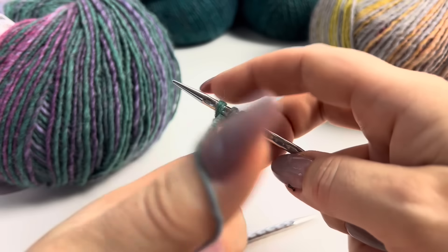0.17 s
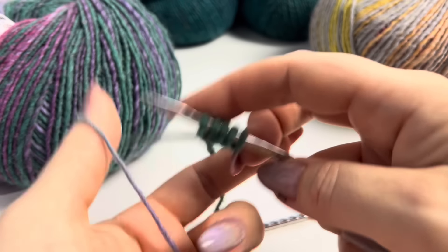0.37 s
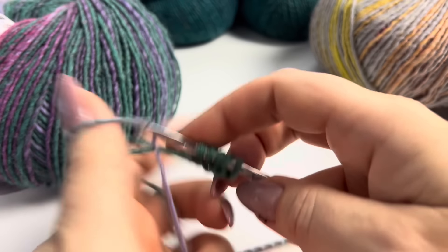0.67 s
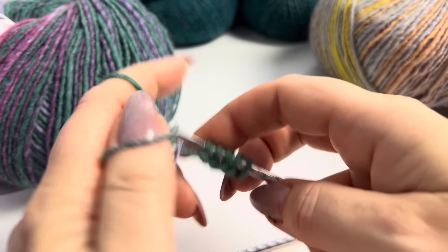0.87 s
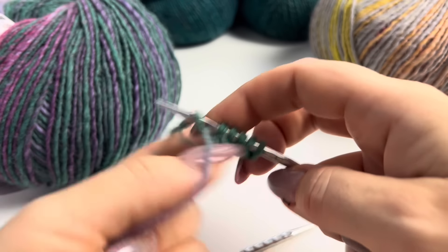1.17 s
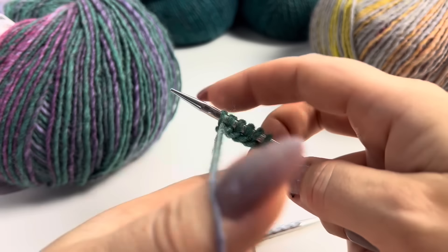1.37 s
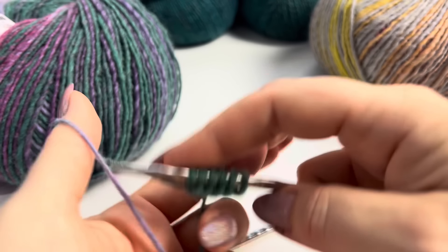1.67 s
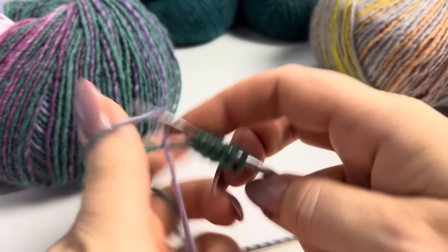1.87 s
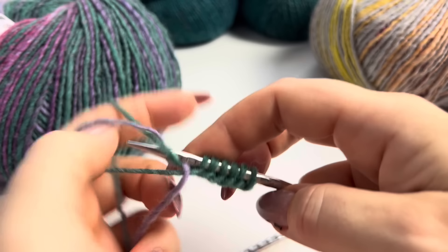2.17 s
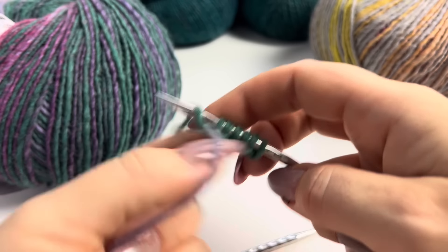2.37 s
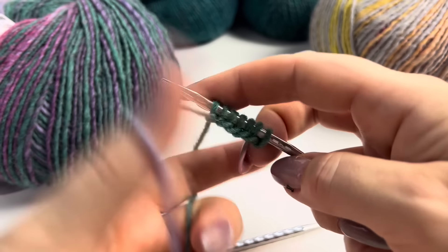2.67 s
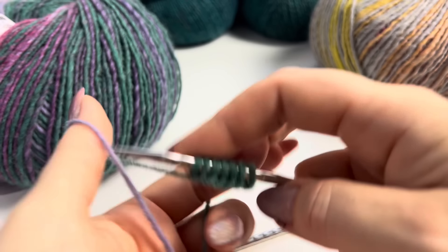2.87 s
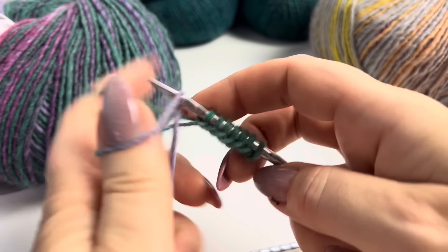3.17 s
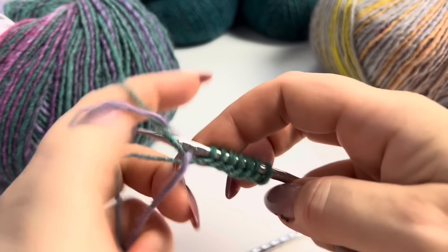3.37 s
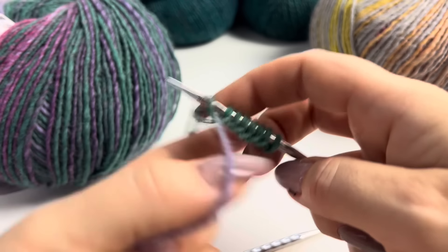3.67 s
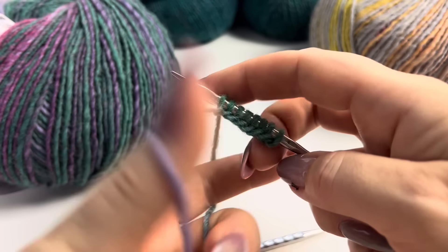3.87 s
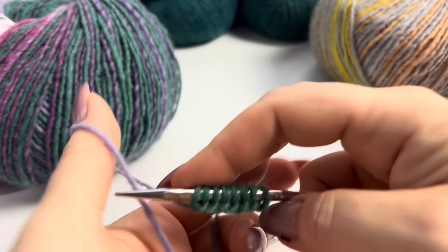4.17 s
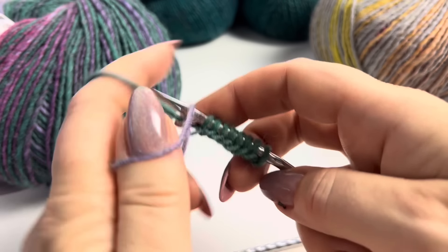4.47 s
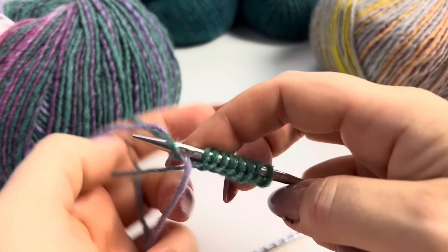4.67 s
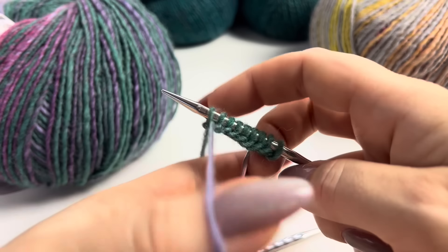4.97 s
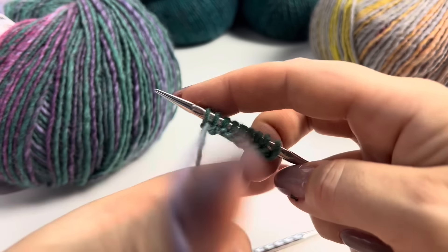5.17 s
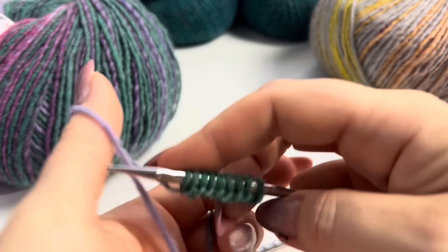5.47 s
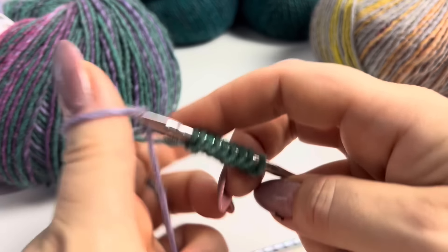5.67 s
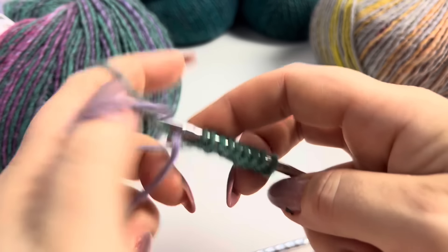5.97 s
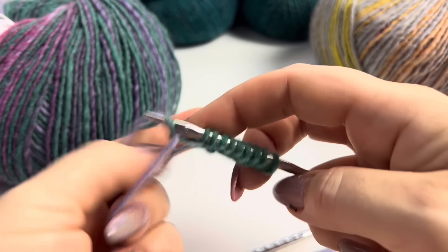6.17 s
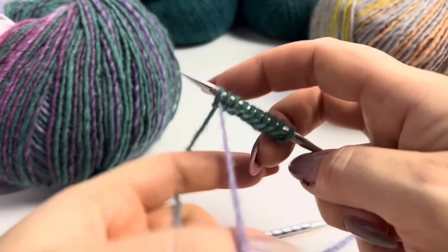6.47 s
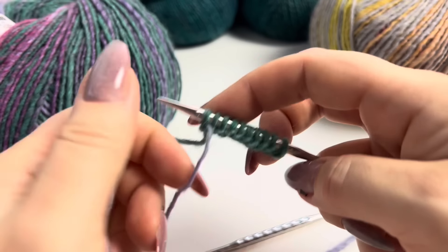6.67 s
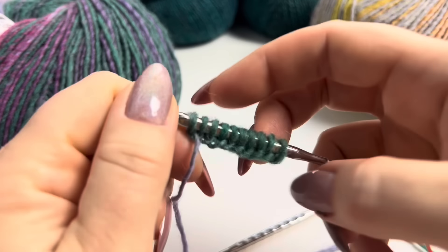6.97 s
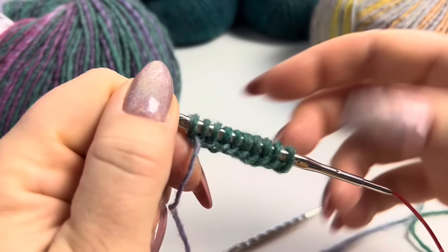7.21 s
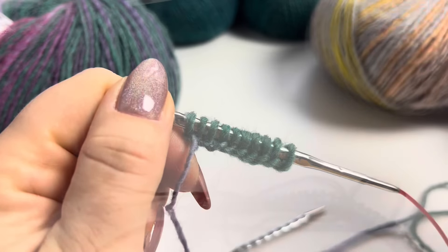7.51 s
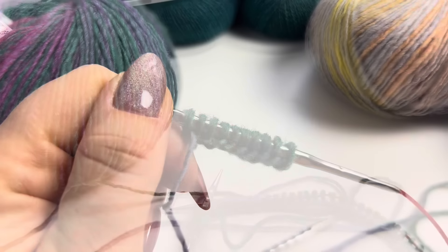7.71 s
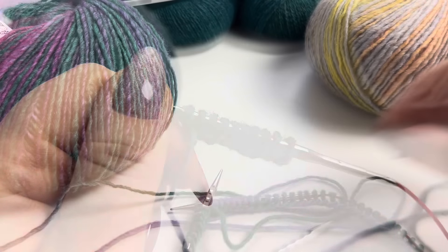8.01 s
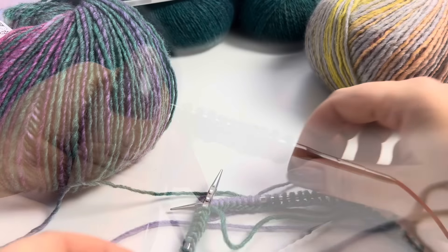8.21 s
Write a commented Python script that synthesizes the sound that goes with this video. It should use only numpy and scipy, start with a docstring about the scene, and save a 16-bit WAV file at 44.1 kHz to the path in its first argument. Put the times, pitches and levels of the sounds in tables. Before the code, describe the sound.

Close, faint clicks of steel needles with short dull table knocks and scratchy dragging, clustering around three and seven seconds over soft room hiss.

```python
"""Metal knitting needles tick together and sing briefly, at a table in a quiet room, close to a phone.
The loose needle and its cable knock, drag and chatter over the table top; yarn once hisses along a needle.
Contacts are noise bursts and short tones through resonances; dragging is random slips and scrape through
the table's modes. The walls answer the needles and knocks. Behind lie slow pushes of air on the microphone
and room tone: faint hum, far murmur and hiss, all made of shaped noise."""
import sys
import numpy as np
from scipy import signal
from scipy.fft import rfft, irfft, next_fast_len
from scipy.io import wavfile
from scipy.ndimage import uniform_filter1d, map_coordinates

SR = 44100
rng = np.random.default_rng(int(sys.argv[2]) if len(sys.argv) > 2 else 0)


def wav_record(signal):
    """Record a signal, one row per channel, as 16-bit PCM in the file named by sys.argv[1]."""
    frames = np.transpose(np.atleast_2d(signal))
    bounded = np.clip(frames, -1, 1)
    # unit amplitude maps onto the largest positive 16-bit level
    quanta = np.round(bounded * 32767).astype(np.int16)
    wavfile.write(sys.argv[1], SR, quanta)


N = 368058  # length in samples
CONTACT_LAG = .001  # from the listed time of a tick or knock to its burst (s)

# Resonances of the table top, in families from low to high.
# Each row: centre in Hz, width in Hz, level in dB against its family.
TABLE_LOW = [(352, 78, -7), (509, 28, -0.5)]
TABLE_DEEP = [(642.5, 55, -2), (725, 20.3, 2.5), (779, 17, -6.5)]
TABLE_BODY = [(807, 21, 1.5), (912, 27, 1.5), (1067.4, 14, -3.5)]
TABLE_MIDDLE = [(1168, 62, -0.5), (1296, 55, -0.5), (1383, 56, -1.5), (1489, 31, 1.5)]
TABLE_HARD = [(1630, 35, 5.5), (1760, 120, 2.5), (1955, 99, 1)]
TABLE_SINGING = [(2061, 34, 4), (2181, 41, 1)]
TABLE_UPPER = [(2304, 77, -2), (2448, 62, 2), (2650, 99, -3), (2825, 40, 0), (2990, 79, -7),
               (3150, 40, -2.5)]
TABLE_FIZZ = [(3385, 120, 0.5), (3870, 220, -3.5), (4190, 320, -6), (4970, 1240, -12), (5600, 310, -11.5),
              (7200, 800, -16)]
FAMILIES = (TABLE_LOW, TABLE_DEEP, TABLE_BODY, TABLE_MIDDLE,
            TABLE_HARD, TABLE_SINGING, TABLE_UPPER, TABLE_FIZZ)


def amp(db):
    """dB to gain."""
    return 10 ** (np.asarray(db) / 20)


def unit(x):
    """Scaled to rms 1."""
    return x / np.sqrt(np.mean(x ** 2) + 1e-20)


def along(points, hz):
    """Values at hz from (Hz, value) points, straight lines on a log frequency axis."""
    f, v = np.transpose(points)
    return np.interp(np.log(hz + 1), np.log(f + 1), v)


def curves(rows):
    """One value per sample for each column after the time."""
    s, *cols = np.transpose(rows)
    return np.array([np.interp(np.arange(N) / SR, s, c) for c in cols])


def wobble(rate):
    """A smooth random curve, rate knots a second."""
    knots = rng.standard_normal(int(N * rate / SR) + 4)
    return map_coordinates(knots, [np.arange(N) * rate / SR])


def filtered(x, response):
    """x times a complex response of frequency."""
    m = next_fast_len(x.shape[-1] + SR)  # spare room for the tail
    return irfft(rfft(x, m) * response(np.fft.rfftfreq(m, 1 / SR)), m)[..., :x.shape[-1]]


def modes(table):
    """Causal response of (Hz, width Hz, dB) resonances, added with alternating sign."""
    def response(f):
        total = 0
        for k, (centre, width, db) in enumerate(table):
            damping = 1j * f * width
            total = total + (-1) ** k * amp(db) * damping / (centre * centre - f * f + damping)
        return total
    return response


def burst(table, t60, rattle, size=4096):
    """One sharp contact with a short rattle behind it wakes resonances unevenly; peak 1."""
    force = rattle * rng.standard_normal(size) * amp(-60 * np.arange(size) / SR / t60)
    force[0] = -1  # the blow itself
    uneven = [(hz, width, db + rng.normal(0, 1.8)) for hz, width, db in table]
    puff = filtered(force, modes(uneven))
    return puff / np.abs(puff).max()


def ticks():
    """Steel meets steel: a bright burst of the tips, a dull one of the shafts, and a brief ring."""
    # Ticks. Each row: time in seconds, level in dB before a common lift,
    # then against the tip burst: shaft burst in dB, ring in dB.
    tick_rows = [(0.0826, -52, 1, -23), (0.133, -57, -1, -25), (0.1609, -59, 2, -25),
                 (0.2607, -58, -6, -30), (0.616, -45, -8, -45), (0.6345, -52, 6, -25),
                 (0.9816, -41, -9, -53), (0.9994, -49, -10, -33), (1.0182, -47, -14, -38),
                 (1.451, -49, -5, -35), (1.6158, -42.5, -15, -40), (1.7272, -48, 8.5, -30),
                 (2.9768, -64, 2, -9), (2.999, -60, 7, -10), (3.026, -33, -4, -38), (3.0705, -52, 0, -7),
                 (3.095, -54, 10, -8), (3.121, -60, 1, -8), (4.2377, -59, 8, -11), (6.8122, -36, -16, -36),
                 (6.818, -45, -11, -28)]
    # Resonances of the tips, then of the shafts. Each row: centre in Hz, width in Hz, level in dB.
    tip_modes = [(14450, 2300, 20), (15200, 1600, 20), (10500, 9900, 3)]
    shaft_modes = [(2500, 900, -40), (4250, 1100, -4), (5740, 3600, 16), (9600, 5600, 5)]
    # Ring where the needle hangs free. Each row: mean pitch in Hz, mean level in dB, t60 in seconds.
    ring_modes = [(12400, 2, 0.099), (12420, -22, 0.06), (13000, -8, 0.03)]
    out, t = np.zeros(N + SR), np.arange(4096) / SR
    for s, db, shaft_db, ring_db in tick_rows:
        ring = 0
        for hz, level, t60 in ring_modes:
            decay = amp(level + rng.normal(0, 4.1) - 60 * t / t60)
            ring = ring + decay * np.sin(2 * np.pi * hz * rng.normal(1, 0.0057) * t)
        tick = burst(tip_modes, 0.011, 0.5)
        tick = tick + amp(shaft_db) * burst(shaft_modes, .003, .15) + amp(ring_db) * ring
        out[round((s + CONTACT_LAG) * SR):][:len(t)] += amp(db + 3.0) * tick
    return out[:N]


def pings():
    """A needle sings briefly, its pitch set by the grip: two close tones beat as they die."""
    # Each row: time in seconds, level of the first tone in dB before onset and decay, pitch in Hz.
    ping_rows = [(0.618, -58, 5300), (0.62, -58, 4100), (2.978, -62, 6900), (3.027, -59, 5450),
                 (3.028, -47, 3410), (3.041, -44, 3450), (3.052, -51, 3450), (3.0712, -60, 7250),
                 (3.072, -54, 4150), (3.077, -55, 5750), (3.082, -58, 7200), (3.091, -60, 6900),
                 (3.095, -59, 4300), (3.128, -68, 7300), (4.238, -64, 7200), (4.24, -56, 2040),
                 (4.26, -61, 2490), (4.367, -64, 3930), (4.589, -59, 2100), (6.8125, -57, 5250),
                 (6.8125, -61, 3350), (6.8125, -60, 7400), (6.813, -51, 2470), (6.825, -45, 1590),
                 (6.826, -48, 2000), (6.826, -62, 7150), (6.838, -64, 7300), (6.862, -67, 7100)]
    t60, onset = 0.047, 0.00056  # decay and onset time constant (s)
    out, t = np.zeros(N + SR), np.arange(4096) / SR
    for s, db, hz in ping_rows:
        near_hz = hz * rng.normal(1, 0.011)
        pair = np.sin(2 * np.pi * hz * t)
        pair = pair + 1.5 * np.sin(2 * np.pi * near_hz * t + rng.uniform(0, 2 * np.pi))
        envelope = amp(db - 60 * t / t60) * (1 - np.exp(-t / onset))
        out[round(s * SR):][:len(t)] += envelope * pair
    return out[:N]


def knocks():
    """A needle lands on the table; a harder contact is sharper and wakes the upper modes more."""
    # Each row: time in seconds, level in dB before the softening,
    # hardness in dB (gain of the sharp part before a common lift).
    knock_rows = [(0.123, -39.5, -7.5), (0.521, -37, -12), (0.589, -42, -10), (0.618, -48, 6),
                  (0.634, -40.5, -4), (0.639, -37, -12), (0.645, -44, -10), (0.673, -39, -10),
                  (0.833, -47, -10), (1.002, -48, -31), (1.149, -42, -11), (1.618, -45.5, 0),
                  (1.808, -31.5, -18), (1.862, -33.5, -14), (2.187, -36, -14.5), (2.459, -42, -9),
                  (2.522, -46, -12), (2.659, -51, -16), (2.924, -37.5, -19), (2.977, -30, -10),
                  (2.999, -39, 0.5), (3.026, -42, -2), (3.041, -25, -23), (3.0708, -24.5, -5),
                  (3.077, -27, -14), (3.095, -47, -4), (3.111, -27, -14), (3.128, -27, -11.5),
                  (3.141, -37, -12), (3.772, -44, -9), (4.236, -47.5, -4), (4.241, -42, -10),
                  (4.26, -46, -16), (4.281, -47, -20), (4.328, -45, -22), (4.342, -42, -20),
                  (4.367, -46, -6), (4.378, -47, -20), (4.589, -45, -20), (4.605, -38, -22),
                  (4.616, -43, -16), (4.649, -43, -14), (4.663, -41, -11), (4.681, -40, -19),
                  (5.536, -45, -12), (5.646, -42, -23), (6.004, -35.5, -11), (6.378, -46, -1.5),
                  (6.54, -58, -22), (6.8122, -36, -5), (6.824, -35.5, -4.5), (6.831, -27, -9.5),
                  (6.838, -37, -16), (6.852, -28, -23), (6.871, -34, -14), (6.887, -36, -18),
                  (6.904, -40, -15), (6.916, -36, -15), (6.989, -49, -13), (7.004, -46, -13),
                  (7.607, -42, -22), (7.68, -49, -24), (7.694, -50, -16), (7.728, -47, -18)]
    # The contact itself, heard directly. Each row: centre in Hz, width in Hz, level in dB.
    contact_modes = [(1520, 3660, -5), (3160, 2000, -10)]
    upper_modes = TABLE_MIDDLE + TABLE_HARD + TABLE_SINGING + TABLE_UPPER + TABLE_FIZZ
    soft_hz = 7100  # the table's give rounds a knock off above this
    out = np.zeros(N + SR)
    for s, db, hard_db in knock_rows:
        sharp = burst(contact_modes, 0.0024, 0.058) + amp(-10.5) * burst(upper_modes, 0.0065, 0.41)
        deep = amp(-17.5) * burst(TABLE_LOW + TABLE_DEEP + TABLE_BODY, 0.011, 0.18)
        hit = deep + amp(hard_db + 8.5) * sharp
        out[round((s + CONTACT_LAG) * SR):][:len(hit)] += amp(db) * hit
    return filtered(out[:N], lambda f: 1 / (1 + 1.4j * f / soft_hz - (f / soft_hz) ** 2) ** 2)


def swell(start, rise, hold, fall):
    """Rise, hold and fall in dB under the top; practically silent before, dying on after."""
    edge_db = 22.5  # starts this far under the top, and is as far down again after the fall time
    t = np.arange(N) / SR - start
    away = np.maximum(1 - t / rise, (t - rise - hold) / fall)
    return np.where(t < 0, -200, -edge_db * np.maximum(away, 0))


def strokes():
    """Gains of the table's families over all strokes of dragging; each family wavers by itself."""
    # Each row: start, rise, hold and fall in seconds, level of the body family in dB before the
    # drag's trim, then against it in dB: low, deep, middle, hard, singing, upper, fizz.
    stroke_rows = [(0.0, 0.075, 0.17, 0.56, -54.5, -8, -3.5, -8, -10.5, -3.5, -6.5, -9.5),
                   (0.428, 0.11, 0.056, 0.044, -56, -5, -2, -11.5, -16.5, -1, -10.5, -21),
                   (0.555, 0.064, 0.012, 0.03, -56.5, -1, -3, -6, -1, 2, 1, -5),
                   (0.629, 0.0031, 0.006, 0.15, -50.5, 1, 0, -3, -6, -4, -2, -4.5),
                   (0.822, 0.016, 0.0081, 0.18, -62.5, -7, -1, -4.5, -7, -9, -15, -15),
                   (0.97, 0.018, 0.02, 0.16, -54.5, -5.5, -3.5, -6, -6, -6, -6.5, -10.5),
                   (1.145, 0.003, 0.022, 0.25, -56.5, -28, -15, -11, -10, -12, -18, -22),
                   (1.181, 0.084, .005, 0.2, -53.5, -9, -4, -8, -15, -9, -8, -13),
                   (1.298, 0.083, 0.01, 0.085, -60, -3, 2.5, -6, -9, 0, 1, -15),
                   (1.612, 0.006, 0.28, 0.24, -57.5, -3, -3, -8.5, -10, -5, -5.5, -9),
                   (2.076, 0.032, 0.1, 0.091, -59.5, -4.5, 2.5, -5.5, -19, -5, -9, -14),
                   (2.332, 0.042, .06, 0.045, -61.5, -15, -11, -27, -23, -18, -17, -22),
                   (2.426, 0.052, .003, 0.026, -61.5, -14, -16, 5, -8, -7, -3, -5),
                   (2.492, 0.041, .005, 0.21, -52.5, -15, -8, -7.5, -11, -8, -10, -15),
                   (2.64, 0.027, .003, 0.033, -62.5, -2, -6, -6, -1, -12, -7, -15),
                   (2.79, .03, 0.24, .04, -69, -5, -7, -16, -15, -7, -12, -18),
                   (2.977, 0.00084, 0.051, 0.033, -56, -3.5, -7, -8, -2, -1, 1.5, -3),
                   (3.03, 0.0022, 0.029, 0.033, -49, 0, -6, -13, -16, -6, 4.5, -4),
                   (3.074, 0.0011, 0.018, 0.053, -52, 0, -9, -4, -4, 2, -2, 1),
                   (3.096, 0.01, 0.029, 0.19, -54.5, 0, -4, 1, -5, -4, 4.5, 0.5),
                   (3.299, 0.034, 0.071, 0.094, -57.5, -9.5, -8, -10, -14, -16, -14, -22),
                   (3.677, 0.032, .003, 0.027, -60, -6, -9, -17, -20, -21, -22, -22),
                   (3.754, 0.018, .005, 0.22, -65.5, -8, -13, 2, -3, -5, -7, -11),
                   (4.02, 0.019, 0.041, .05, -63, -10, -3, -23, -24, -19, -32, -25),
                   (4.235, 0.0035, 0.037, 0.06, -56.5, -1.5, 2.5, -1.5, -3, -6, -5, -11),
                   (4.292, 0.064, .005, 0.15, -56.5, -20, -7, -5.5, -6, -10, -8, -13),
                   (4.519, 0.013, .05, 0.028, -68, -19, -8, -16, -22, -18, -20, -22),
                   (4.57, 0.037, 0.023, 0.044, -56.5, -10, 4, -7, -23, -7, -12, -16),
                   (4.636, 0.02, 0.028, 0.084, -58, -10, -1.5, -3.5, -12, -2, -6.5, -18),
                   (4.788, 0.035, .005, 0.064, -59.5, -14, -11, -4.5, -15, -15, -11, -19),
                   (5.523, 0.0092, 0.018, 0.094, -56, -19, -5, -3, -6, -10, -10, -24),
                   (5.631, 0.011, 0.063, 0.12, -60, -29, -14, 2, -6, -6, -5, -11),
                   (5.918, 0.027, 0.096, 0.1, -62, -19, -9, -3, -13, -9, -10, -15),
                   (6.177, 0.13, 0.16, 0.11, -57, -8.5, -3.5, -3, -9.5, -5.5, -6, -12.5),
                   (6.519, .03, .003, 0.06, -59, -19, -20, -10, -7, -17, -11, -19),
                   (6.811, 0.0012, 0.0091, 0.035, -60, -3, 3, -2, 1.5, 6, 4, 5),
                   (6.822, 0.0018, 0.014, 0.06, -61, 6, 1, -5, 3, -2, 5, -5),
                   (6.834, 0.02, 0.053, 0.08, -55, -2, 2.5, -0.5, -1, -3.5, 0.5, -5),
                   (6.924, .02, 0.073, 0.087, -71, -4, -10, -9, -3, 4, -2, -8),
                   (7.477, 0.031, 0.041, 0.08, -64.5, -6, 9.5, -4, -17, -3, -7, -13),
                   (7.547, 0.042, 0.06, 0.06, -59.5, -11, 1.5, -6, -17, -8, -8, -14),
                   (7.648, 0.033, 0.052, 0.039, -61, -7, 5.5, -3, -17, -5, -4.5, -13),
                   (7.724, 0.022, 0.038, 0.072, -66, -21, 3, -17, -21, -12, -8, -15)]
    flutter_db, flutter_rate = 1.28, 30  # depth (dB), knots per second
    gains = np.zeros((len(FAMILIES), N))
    for start, rise, hold, fall, db, low_db, deep_db, *above_db in stroke_rows:
        family_db = np.array([low_db, deep_db, 0, *above_db])
        gains += amp(db + family_db[:, None] + swell(start, rise, hold, fall))
    return gains * amp(flutter_db * np.array([wobble(flutter_rate) for _ in gains]))


def drag():
    """Irregular tiny slips and a finer scrape, at a steady mean force, drive the table's modes."""
    slip_now = rng.random(N) < 420 / SR  # about 420 slips a second
    slips = slip_now * amp(4.2 * np.clip(rng.standard_normal(N), -1.5, 1.5))
    scrape = 1.18 * rng.standard_normal(N) * amp(1.8 * wobble(45))
    force = scrape - unit(slips)
    out = 0
    for gain, table in zip(strokes(), FAMILIES):
        bottom, top = table[0][0] * .88, table[-1][0] * 1.12

        def family(f):
            """The modes, with little sound outside the family."""
            return modes(table)(f) / (1 + (f / top) ** 8) * f ** 8 / (f ** 8 + bottom ** 8)

        sound = filtered(force, family)
        # levelled over 1/16 s, so that the strokes set the loudness
        power = np.abs(uniform_filter1d(sound ** 2, size=SR // 16))
        out = out + amp(-4.5) * gain * sound / np.sqrt(power + 1e-12)
    return out


def yarn():
    """A short thin hiss as yarn slides along the needle: noise through one resonance."""
    # Yarn sliding on steel. One row: start, rise, hold and fall in seconds, level in dB.
    slide = (5.6, .05, .07, .04, -70)
    *shape, db = slide
    hiss = unit(filtered(rng.standard_normal(N), modes([(6260, 560, 0)])))
    return amp(db + swell(*shape)) * hiss


def walls(x):
    """The room's answer: a noise tail in which each frequency dies at its own speed."""
    # Each row: frequency in Hz, t60 in seconds.
    wall_decay = [(300, .3), (2000, .22), (10000, .1)]
    hz, t, z = signal.stft(rng.standard_normal(SR // 2), SR, nperseg=256)
    fade = amp(-60 * t / along(wall_decay, hz)[:, None])
    tail = signal.istft(z * fade, SR, nperseg=256)[1]
    late = np.pad(x, (250, 0))  # samples before the answer starts
    return signal.fftconvolve(late, tail / np.linalg.norm(tail))[:N]


def air():
    """Pushes of air and a slight drift; the microphone's vent leaks them away, so each swings back."""
    # Each row: start in seconds, peak pressure (full scale 1, before the vent), time constant in seconds.
    push_rows = [(0.116, 0.219, 0.232), (0.528, 1.014, 0.046), (0.624, 0.456, 0.058), (1.223, 0.099, 0.127),
                 (1.583, 0.08, 0.038), (2.833, 0.113, 0.039), (3.963, 0.046, 0.069), (4.962, 0.026, 0.052),
                 (5.38, 0.205, 0.189), (6.064, 0.131, 0.281), (6.923, 0.318, 0.658), (7.324, 0.083, 0.048),
                 (7.741, -0.187, 0.087), (7.866, 0.174, 0.041)]
    t = np.arange(N) / SR
    pressure = .012 * wobble(4) + .002 * wobble(10)
    for s, size, tau in push_rows:
        u = np.maximum(t - s, 0) / tau
        pressure += size * u ** 2 * np.exp(2 - u) / 4  # peaks two time constants after the start
    # high-pass at 0.93 Hz, heavily damped
    return filtered(pressure, lambda f: -f * f / (.93 ** 2 - f * f + 1j * f * 3.45))


def room_tone():
    """Low hum in the room's modes, a far murmur and the hiss of the microphone, all shaped noise."""
    # Spectrum shared by murmur and hiss. Each row: frequency in Hz, relative density in dB per Hz.
    spectrum = [(71, -57), (120, -1), (167, -14.5), (201, -2), (323, -3), (637, -14), (904, -13.5),
                (1130, -17), (1940, -19), (2430, -19.5), (2860, -21.5), (14900, -23), (16500, -25)]
    # Low room modes. Each row: centre in Hz, width in Hz, level in dB within its group.
    hum_modes = [(23.6, 5.6, -60), (41.8, 8, -64.5), (66.1, 6.8, -63.5), (104.4, 5.6, -65),
                 (158, 36, -70.5)]
    # Level of the hum. Each row: time in seconds, lowest three modes in dB, upper two in dB.
    hum_level = [(0, -59, -64.5), (0.5, -61.5, -65), (1.0, -57.5, -64), (1.5, -58.5, -63),
                 (2.1, -59.5, -64.5), (2.6, -59.5, -66), (3.0, -55, -62), (3.4, -59.5, -67.5),
                 (3.9, -60.5, -62.5), (4.3, -57.5, -63.5), (4.7, -60.5, -64), (5.2, -61, -67),
                 (5.6, -62, -65), (6.0, -60, -65.5), (6.5, -61.5, -66), (7.0, -60, -63.5),
                 (7.4, -57.5, -65), (7.85, -59, -66.5), (8.1, -62.5, -66), (8.35, -61, -66)]
    # Level of the far murmur before its wavering. Each row: time in seconds, level in dB.
    murmur_level = [(0.0, -57), (0.56, -66), (0.95, -69.5), (1.9, -63), (2.39, -68.5), (2.83, -68.5),
                    (3.14, -64), (3.58, -68.5), (4.21, -73), (5.53, -63), (5.95, -69.5), (6.97, -61.5),
                    (7.32, -66.5), (7.86, -73), (8.35, -66.5)]
    # Level of the hiss, which dips near the end. Each row: time in seconds, level in dB.
    hiss_level = [(0, -65), (7.3, -65), (7.86, -68), (8.35, -66.5)]
    (murmur_db,), (hiss_db,) = curves(murmur_level), curves(hiss_level)

    def low(f):
        """Share of power that goes to the murmur; the rest is hiss."""
        return 1 / (1 + (f / 900) ** 2)

    murmur = filtered(rng.standard_normal(N), lambda f: amp(along(spectrum, f)) * np.sqrt(low(f)))
    hiss = filtered(rng.standard_normal(N), lambda f: amp(along(spectrum, f)) * np.sqrt(1 - low(f)))
    hum = 0
    for db, group in zip(curves(hum_level), (hum_modes[:3], hum_modes[3:])):
        hum = hum + amp(db) * unit(filtered(rng.standard_normal(N), modes(group)))
    return amp(murmur_db + wobble(2.06)) * unit(murmur) + amp(hiss_db) * unit(hiss) + hum


def scene():
    """Needles and table with the room's answer, over air and room tone."""
    steel, wood = ticks() + pings(), knocks()
    echoes = walls(amp(-11) * steel + amp(-5) * wood)
    return (steel + wood + echoes + drag() + yarn() + air() + room_tone())[None]


def record(dry):
    """The phone cuts the sound off steeply above its band limit."""
    top_hz = 15950
    return filtered(dry, lambda hz: 1 / (1 + (hz / top_hz) ** 90))


dry = scene()
out = record(dry)
wav_record(out)
```